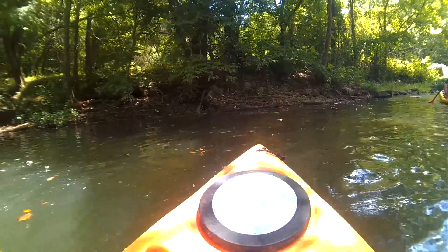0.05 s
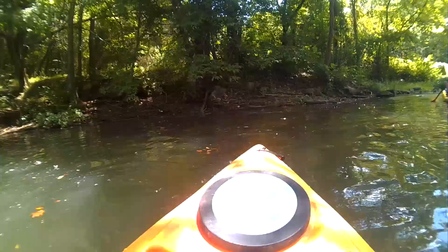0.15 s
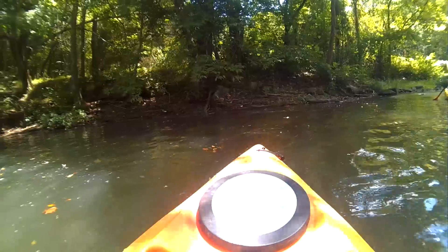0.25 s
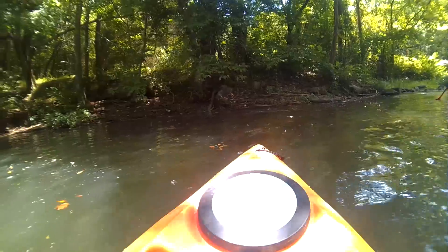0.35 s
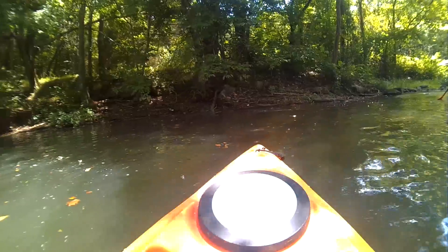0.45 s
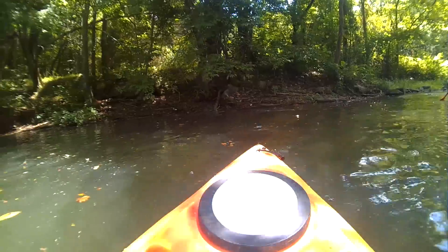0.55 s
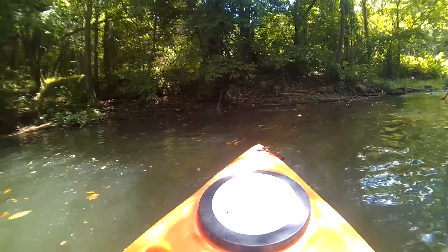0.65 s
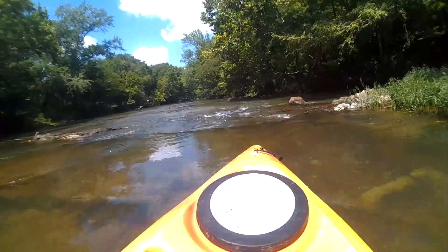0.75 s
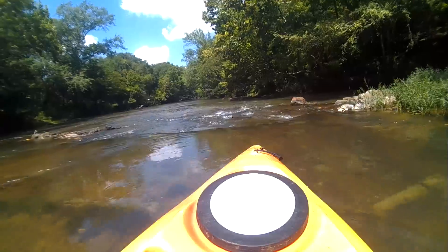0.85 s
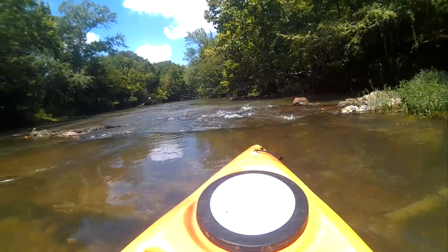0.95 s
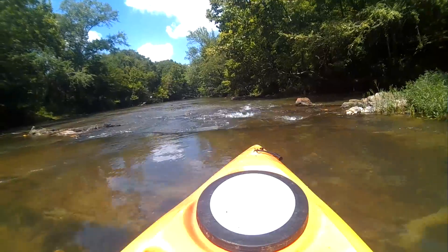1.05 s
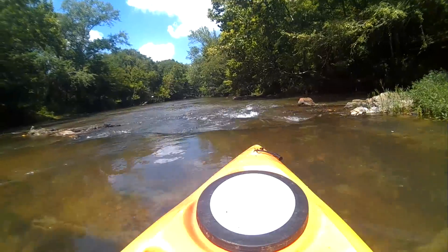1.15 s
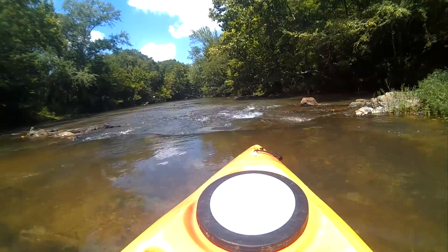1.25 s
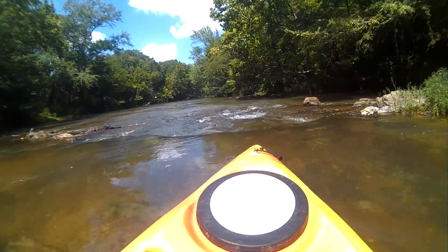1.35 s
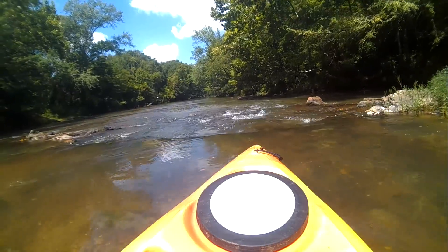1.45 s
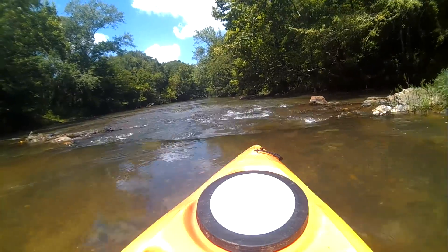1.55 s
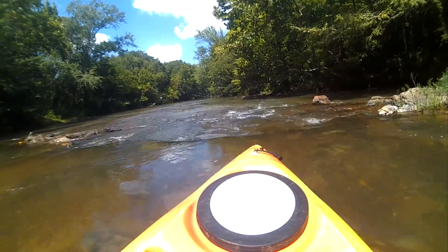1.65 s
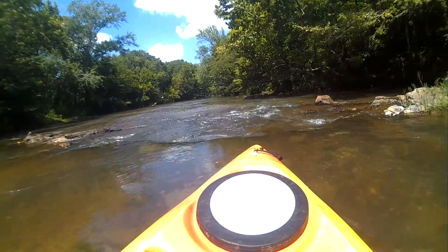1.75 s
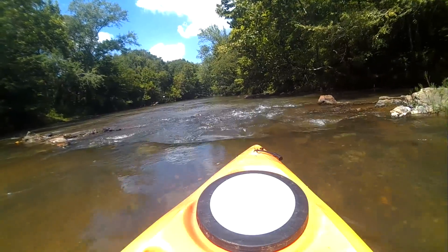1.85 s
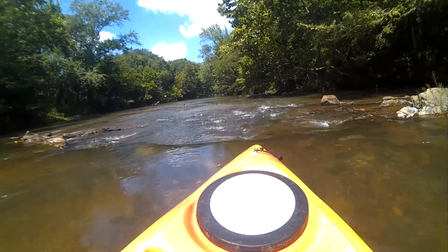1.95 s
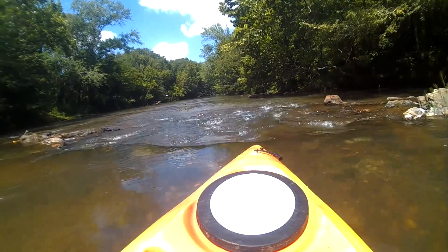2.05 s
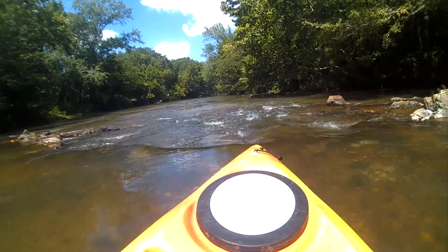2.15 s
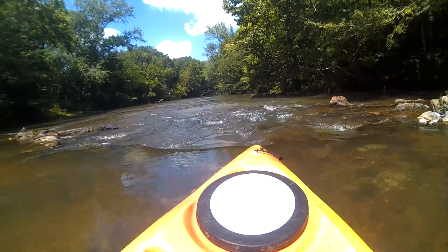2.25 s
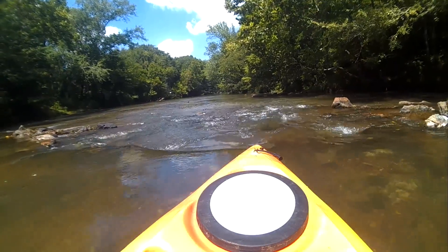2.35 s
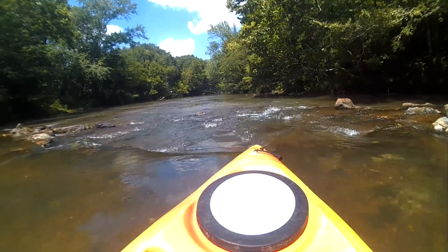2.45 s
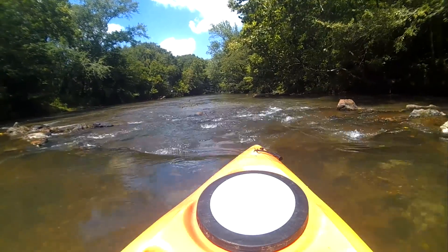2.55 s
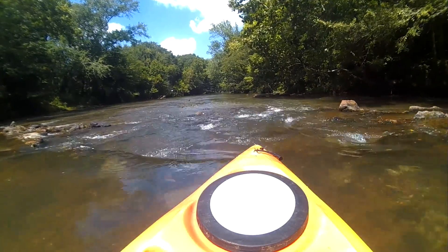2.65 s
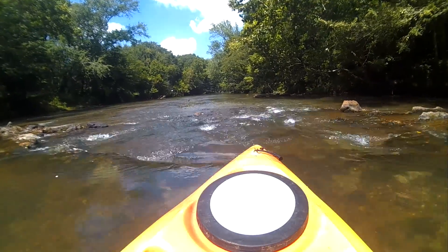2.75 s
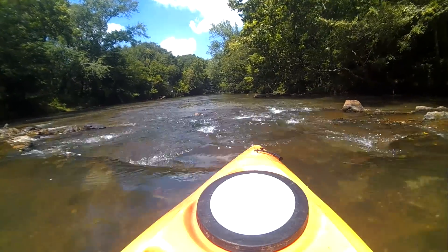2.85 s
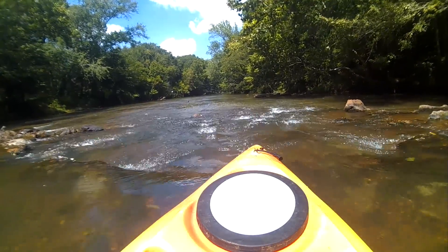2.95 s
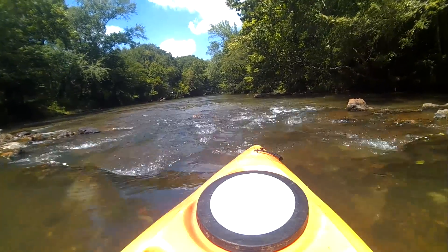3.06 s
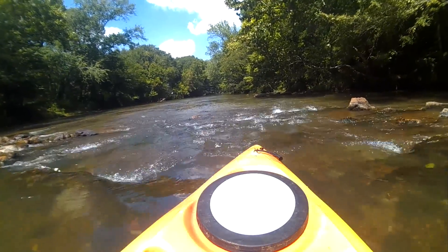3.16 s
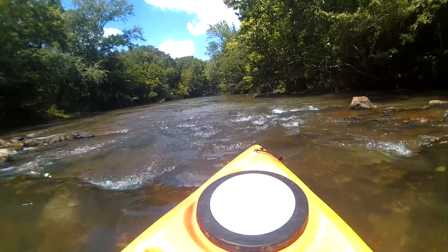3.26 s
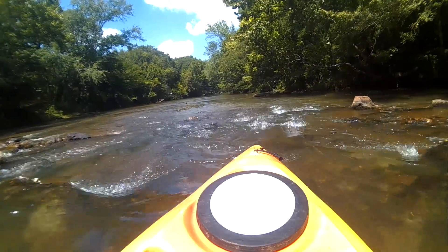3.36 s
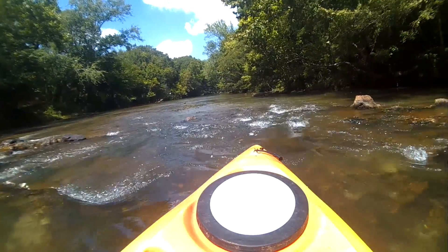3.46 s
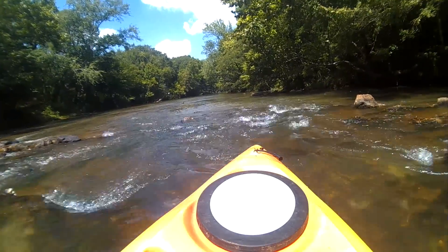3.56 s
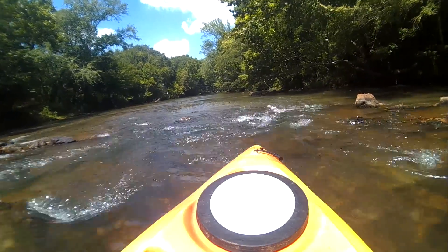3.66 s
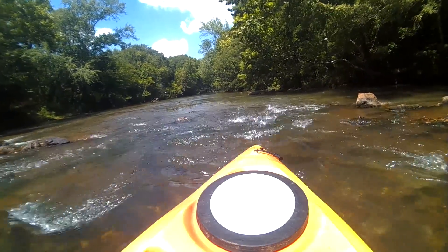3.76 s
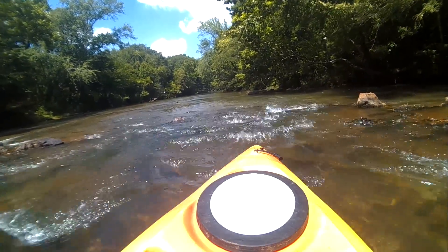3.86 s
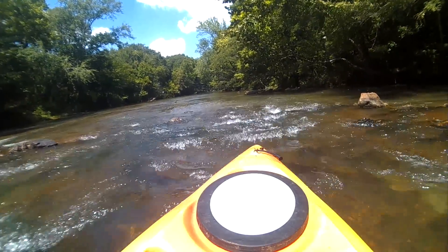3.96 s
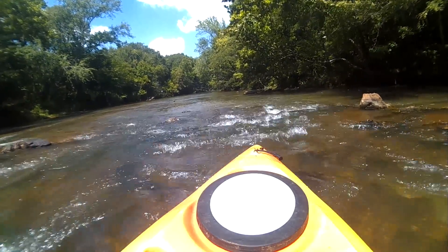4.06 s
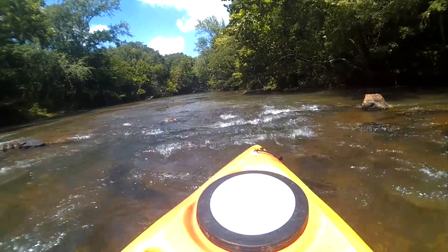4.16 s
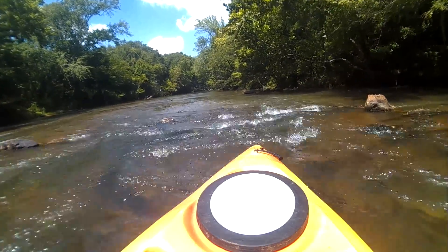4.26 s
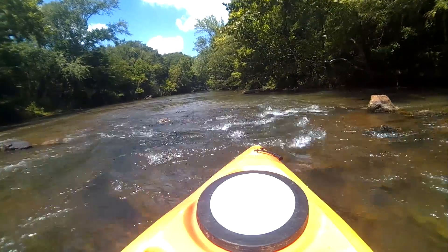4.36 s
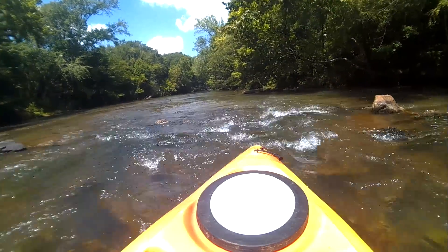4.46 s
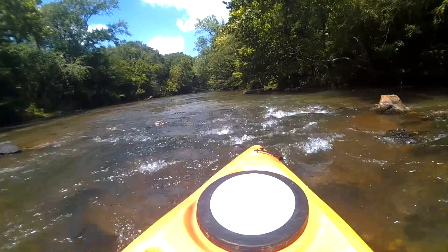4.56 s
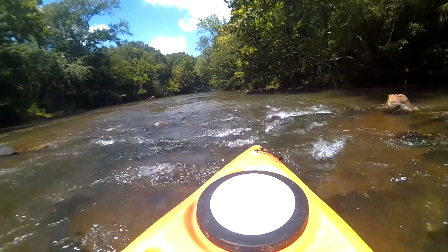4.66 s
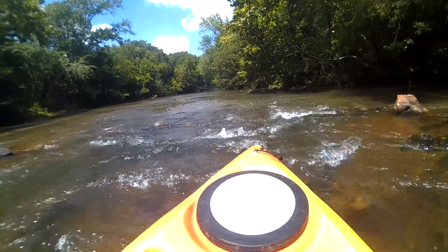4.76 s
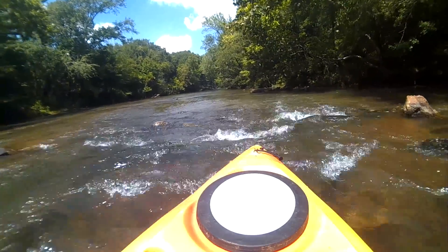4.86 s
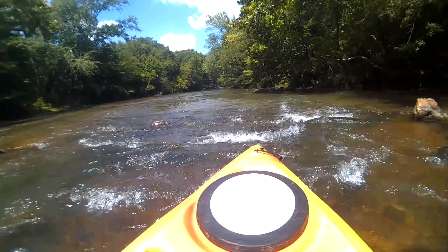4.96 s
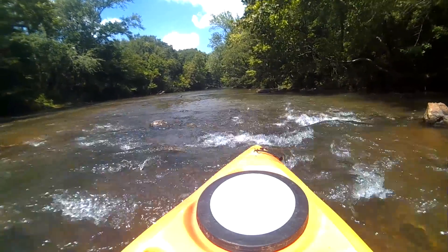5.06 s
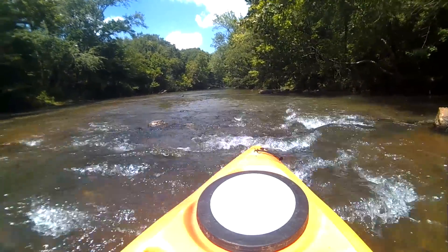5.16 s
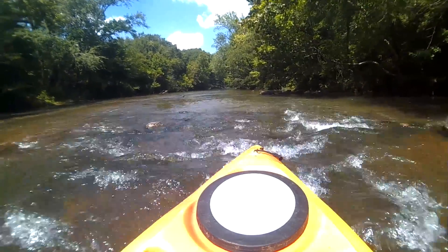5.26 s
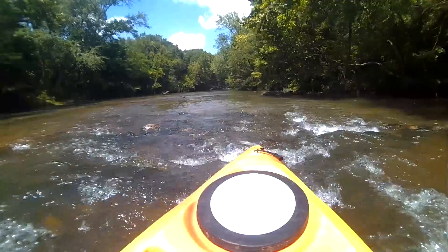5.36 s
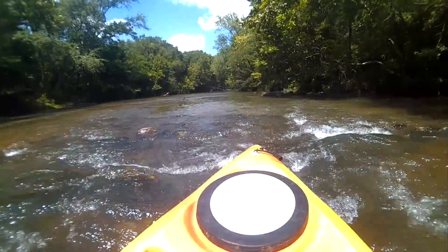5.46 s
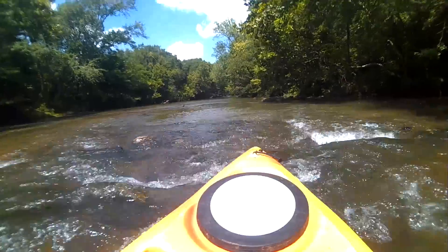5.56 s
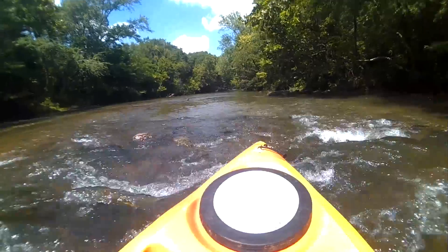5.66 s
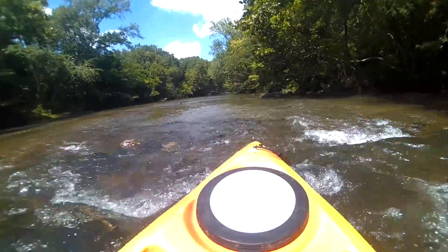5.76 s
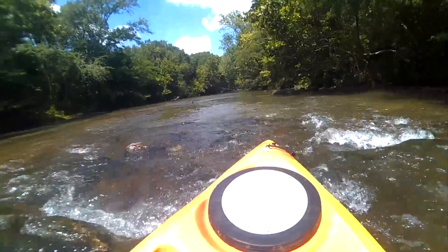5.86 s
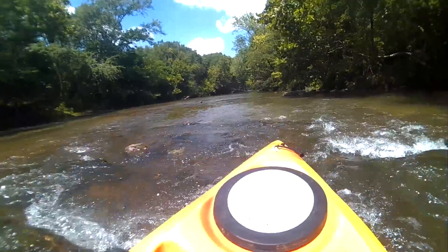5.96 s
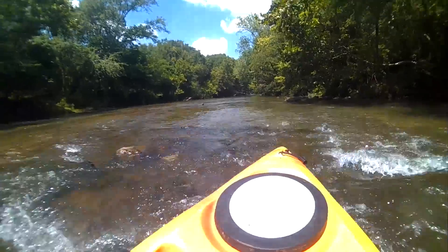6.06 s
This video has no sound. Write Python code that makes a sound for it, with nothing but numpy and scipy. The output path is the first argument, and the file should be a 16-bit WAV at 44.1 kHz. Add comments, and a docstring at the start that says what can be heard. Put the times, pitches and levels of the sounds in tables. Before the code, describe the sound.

Outdoors on a shallow creek, heard close and boxy on a kayak: very quiet water with faint hiss and a thin high whine, then an abrupt step up to gentle burbling. Wavelets tap and thump the hollow hull, increasingly busy. Finally the bottom slams and scrapes over rocks, overloading the microphone with low boom and harsh clatter, before easing into bubbling and renewed scraping.

```python
"""A plastic kayak hull strikes and grinds over stones: noise rings its modes, knocks ring a sealed case,
and a low boom drives the microphone diaphragm to its stops. Before that, calm water gives way to a riffle
drawing near: coloured noise and damped tones, muffled by the case. Waves thump the hull, gurgle and tap.
Preamplifier hiss and a thin high whine lie beneath."""
import sys
import numpy as np
from scipy import signal
from scipy.fft import rfft, irfft, next_fast_len
from scipy.io import wavfile
from scipy.ndimage import uniform_filter1d, map_coordinates

SR = 44100
rng = np.random.default_rng(int(sys.argv[2]) if len(sys.argv) > 2 else 0)


def convert_level_to_amplitude(level_db):
    """Map a level in decibels to its linear amplitude factor."""
    exponent = np.asarray(level_db, float) / 20
    return 10 ** exponent


def generate_wav(signal):
    """Clip the signal to [-1, 1] and save it as 16-bit WAV at the path in sys.argv[1]."""
    frames = np.transpose(np.atleast_2d(signal))
    scaled = np.clip(frames, -1, 1) * 32767
    pcm = np.round(scaled).astype(np.int16)
    wavfile.write(sys.argv[1], SR, pcm)


N = 269451

# Levels are set before the diaphragm's gating; the spectra already include the case.
# electronic whine, a comb of close lines: pitch_hz, level_db
WHINE_LINES = [(14176, -108), (14266, -106), (14357, -104), (14447, -102), (14538, -97), (14629, -93),
               (14719, -96), (14810, -104)]
# spectrum of the preamplifier hiss: frequency_hz, gain_db
HISS_SPECTRUM = [(20, -8.5), (300, -14.5), (3500, 1), (5200, -6), (5900, -19), (6900, -8.5), (8000, -22),
                 (9200, -10.5), (11000, -6.5), (12500, -6.5), (14300, -5), (15000, -9.5), (15700, -9),
                 (16000, -49)]
# the riffle draws near: time_s, level_db
RIVER_LEVEL = [(0.0, -62.5), (0.78, -64), (0.8, -57.5), (1.2, -56), (1.7, -57), (2.5, -54.5), (3.1, -55.5),
               (3.7, -54), (3.9, -52.5), (4.3, -52.5), (4.9, -46.5), (5.2, -46), (5.35, -50)]
# spectrum of the water through the case: frequency_hz, gain_db
WATER_SPECTRUM = [(59, -80), (100, -28), (166, -29.5), (391, -29), (504, -30), (555, -27.5), (1030, -13),
                  (1250, 1), (1510, -14), (2000, -15), (2280, -17.5), (2710, -13), (3330, -21), (3600, -33),
                  (4430, -34), (5760, -62.5), (9750, -120)]
# slaps near the bow ringing the case: start_s, level_db, pitch drawn at random
BOW_SLAPS = [(.165, -49), (0.368, -44), (1.091, -40.5), (1.1318, -40), (1.4718, -40), (2.17, -43),
             (2.312, -45), (2.435, -37.5), (2.487, -40), (2.595, -44), (2.6152, -38), (2.795, -42),
             (2.9577, -37.5), (3.441, -40.5), (3.908, -43), (4.0296, -38), (4.1026, -45), (4.157, -50),
             (4.2254, -37), (4.5326, -33.5), (4.7024, -32), (4.7653, -33.5), (4.8163, -34), (4.92, -33.5),
             (4.9754, -29), (5.007, -29), (5.0588, -40), (5.1185, -32), (5.169, -38), (5.254, -33)]
# waves shouldering the hull: start_s, hold_s, thump_db, gurgle_db
HULL_WAVES = [(0.071, .03, -78.5, -82), (0.257, 0.024, -73, -80), (0.346, 0.017, -77, -78),
              (0.395, .12, -72, -88), (1.334, 0.082, -63.5, -72), (1.469, 0.031, -65, -79),
              (3.264, .005, -64, -80), (3.355, 0.14, -75.5, -89), (3.716, 0.37, -75.5, -82.5),
              (4.087, .03, -70, -79), (4.242, 0.052, -74, -79), (4.367, .03, -80, -76),
              (4.475, 0.027, -73, -88), (4.585, 0.044, -59.5, -75), (4.696, .06, -64, -75),
              (4.786, 0.028, -62, -64.5), (4.879, .02, -69, -67), (4.97, 0.038, -67, -61),
              (5.101, .02, -59.5, -64), (5.17, 0.018, -56, -65), (5.238, 0.022, -60.5, -60),
              (5.289, .02, -57, -68)]
# small waves tapping the hull: start_s, level_db
WAVE_TAPS = [(1.334, -65.5), (1.38, -67), (1.42, -66), (1.468, -68), (4.724, -52), (4.982, -57),
             (5.102, -54.5), (5.279, -60)]
# what a tap rings in the hull: pitch_hz, level_db (added to the tap's), t60_s
TAP_TONES = [(243, -9.5, 0.072), (304.4, 0.0, .25), (420, -14.5, .17)]
# bubbles and short single rings: start_s, level_db, starting pitch_hz, t60_s
BUBBLE_TONES = [(.22, -70, 140, .2), (.36, -67, 146, .2), (.085, -67, 520, .1), (.21, -57, 2740, 0.09),
                (.215, -54.5, 2160, 0.055), (.81, -53, 2720, .07), (3.268, -63.5, 135, .11),
                (3.96, -59, 560, .11), (4.349, -55.5, 540, 0.074), (4.885, -45.5, 484, 0.059),
                (4.96, -52, 540, 0.19), (5.0, -55, 410, .15), (5.224, -53.5, 588, 0.11),
                (5.275, -54.5, 570, .08), (5.69, -34.5, 2660, 0.24), (5.69, -33.5, 540, 0.23),
                (5.805, -31, 405, 0.074), (5.855, -31.5, 2130, .06), (5.916, -16, 1224, 0.051),
                (5.925, -28, 446, 0.12), (5.97, -31.5, 561, 0.28), (6.0, -28.5, 635, 0.12),
                (6.0, -30, 380, 0.12), (6.04, -34, 860, 0.14), (6.05, -24.5, 1290, 0.12),
                (6.065, -32, 2120, 0.084)]
# lowest resonance of the hull: centre_hz, width_hz, gain_db
KEEL_MODE = [(59, 12, 0)]
# resonances of the hull's shell: centre_hz, width_hz, gain_db
SHELL_MODES = [(136, 26, 1.5), (232, 18, 0.5), (296.7, 29, 3.5), (413, 27, 2), (540, 46, 3.5),
               (860, 53, -24.5)]
# narrow resonances of the case: centre_hz, width_hz, gain_db
CASE_RESONANCES = [(2668, 71, -1), (2020, 160, -7), (3816, 75, -0.5)]
# roll-off of the sealed case: frequency_hz, gain_db
CASE_ROLLOFF = [(4500, -0.5), (5600, -0.5), (6000, -20.5), (16000, -35.5)]
# pitch of the struck hull, near 51 Hz; short spikes advance its phase at hard blows: time_s, pitch_hz
BOOM_PITCH = [(5.36, 102), (5.41, 52), (5.53, 49.6), (5.545, 86.7), (5.56, 55.5), (5.62, 55.5),
              (5.64, 49.3), (5.7, 47.1), (5.79, 53.8), (5.85, 52)]
# swing of the diaphragm, 0 dB = its stops: time_s, level_db
BOOM_SWING = [(5.35, -48), (5.385, 5), (5.45, 6), (5.72, -0.5), (5.77, -10), (5.8, -14.5), (5.85, -49)]
# grinding over stones: time_s, hollow_scrape_db, bright_scrape_db
GRIND_LEVELS = [(5.33, -64, -62), (5.376, -45, -38), (5.416, -25.5, -33.5), (5.46, -30.5, -34.5),
                (5.52, -31.5, -37), (5.545, -45, -31), (5.6, -45, -41), (5.64, -38, -31.5),
                (5.67, -49, -40), (5.77, -39.5, -39.5), (5.85, -49.5, -40.5), (6.02, -37.5, -37),
                (6.11, -26.5, -35.5)]
# stones shoving the hull: start_s, rumble_db, shell_db
STONE_SHOVES = [(5.352, -29, -41), (5.375, -32, -60), (5.5, -37, -22), (5.535, -31.5, -44),
                (5.628, -35.5, -22.5), (5.74, -56.5, -37.5), (5.796, -36, -34.5), (6.03, -43.5, -42)]
# stones knocking the hull: start_s, level_db, brightness_db (treble over bass), t60_s
STONE_KNOCKS = [(5.357, -26, -3, 0.12), (5.3785, -8, -6, 0.041), (5.382, -6, 6, .0084),
                (5.3902, -9, 1.5, .0084), (5.395, -8.5, -4, .043), (5.402, -15, -2, .055),
                (5.415, -26.5, -6.5, 0.078), (5.452, -16, 1, 0.013), (5.463, -35.5, 5, 0.076),
                (5.5129, -16, -9, 0.018), (5.542, -15, -1, 0.051), (5.548, -11, -3, 0.062),
                (5.562, -5.5, -4.5, 0.02), (5.571, -25, -4, 0.029), (5.623, -30.5, 0.0, 0.23),
                (5.630, -22, 2, 0.036), (5.637, -22, 12, 0.018), (5.647, -15.5, -1, .0082),
                (5.742, -37.5, 4, .035), (5.76, -34, 11, 0.037), (5.7996, -19.5, 2.5, 0.019),
                (5.804, -25.5, -4.2, 0.07), (5.915, -11, -9, 0.024), (5.929, -36, -.6, .023),
                (5.975, -30.5, 1, 0.028)]
# spectrum of the scrape through the case: frequency_hz, gain_db
SCRAPE_SPECTRUM = [(410, -40), (700, -6), (774, -40.5), (849, -11.5), (953, -11.5), (1250, -3),
                   (1590, -17.5), (1880, -11), (2140, -4.5), (2390, -13), (2720, -17.5), (3230, -22.5),
                   (3540, -34), (3920, -34), (4430, -42.5), (5760, -76.5), (9750, -120)]
# spectrum of a knock through the case: frequency_hz, gain_db
KNOCK_SPECTRUM = [(180, -58.5), (300, -2), (638, -14), (1060, -3), (1340, 8), (1740, -7), (2130, 3),
                  (2610, -8), (3020, -4.5), (3270, -13), (3700, -22), (4430, -32.5), (5760, -60.5),
                  (9750, -120)]
# treble splatter of the overdriven microphone at hard knocks: frequency_hz, gain_db
SPLATTER_SPECTRUM = [(3000, -56), (5000, -4), (7500, -16), (10000, -7.5), (12500, -3.5), (15000, -14.5),
                     (16000, -56)]


def unit(x):
    """Normalisation: the signal scaled to rms 1."""
    return x / np.sqrt(np.mean(x ** 2) + 1e-20)


def curves(rows, outside=-120):
    """Linear interpolation of each column after the time, corners rounded over 10 ms."""
    times, *columns = np.transpose(rows)
    t = np.arange(N) / SR
    lines = [np.interp(t, times, column, left=outside, right=outside) for column in columns]
    return uniform_filter1d(lines, size=SR // 100, axis=1, mode="nearest")


def wobble(rate):
    """Band-limited fluctuation: a smooth random curve with rate knots a second."""
    knots = rng.standard_normal(int(N * rate / SR) + 4)
    return map_coordinates(knots, [np.arange(N) * rate / SR])


def noise():
    """White noise: equal power at all frequencies, rms near 1."""
    return rng.standard_normal(N)


def filtered(x, response):
    """Linear filtering: the spectrum of x times a complex response of frequency."""
    m = next_fast_len(N + SR // 2)
    return irfft(rfft(x, m) * response(np.fft.rfftfreq(m, 1 / SR)), m)[:N]


def colour(points):
    """Minimum phase: a causal response from (Hz, dB) points by folding the cepstrum."""
    def response(hz):
        f, db = np.transpose(points)
        gain_db = np.interp(np.log(hz + 1), np.log(f + 1), db)
        cepstrum = irfft(np.log(convert_level_to_amplitude(gain_db)))
        half = len(cepstrum) // 2
        cepstrum[1:half] *= 2
        cepstrum[half + 1:] = 0
        return np.exp(rfft(cepstrum))
    return response


def modes(table):
    """Modal superposition: (centre Hz, width Hz, dB) resonances summed with alternating sign."""
    def response(f):
        return sum((-1) ** k * convert_level_to_amplitude(db) * 1j * f * width / (centre ** 2 - f ** 2 + 1j * f * width)
                   for k, (centre, width, db) in enumerate(table))
    return response


def split(x, edge_hz):
    """Complementary crossover: the parts below and above an edge, which sum to x."""
    below = filtered(x, lambda hz: 1 / (1 + (hz / edge_hz) ** 8))
    return below, x - below


def patchy(patchy_db, span):
    """Granular noise: its gain varies in patches of time (span frames) and pitch."""
    z = signal.stft(noise(), nperseg=256)[2]
    field = uniform_filter1d(rng.standard_normal(z.shape), 2, 0)
    field = uniform_filter1d(field, round(span), 1)
    return unit(signal.istft(z * convert_level_to_amplitude(patchy_db * unit(field)), nperseg=256)[1][:N])


def bubbles(table, rise):
    """Damped oscillation: soft-starting tones that decay by 60 dB in t60 while their pitch climbs."""
    out, t = np.zeros(N + SR), np.arange(SR // 5) / SR
    for start, db, hz, t60 in table:
        tone = np.sin(2 * np.pi * hz * t * (1 + rise * t / t60))
        envelope = convert_level_to_amplitude(db - 60 * t / t60) * (1 - np.exp(-t / 0.0021))
        out[round(start * SR):][:len(t)] += envelope * tone
    return out[:N]


def swells(rows, rise_s, fall_db_per_s):
    """Incoherent addition: powers of (start s, hold s, dB) swells that rise, hold and fall."""
    t = np.arange(N) / SR
    power = 0
    for start, hold, db in rows:
        falling = np.clip(t - start - rise_s - hold, 0, None)
        power = power + convert_level_to_amplitude(db - fall_db_per_s * falling) ** 2 * np.clip((t - start) / rise_s, 0, 1) ** 2
    return np.sqrt(power)


def ringing(x):
    """Parallel resonance: narrow modes of the case added to the direct sound."""
    return filtered(x, lambda f: 1 + sum(modes([mode])(f) for mode in CASE_RESONANCES))


def shell(patchy_db):
    """Modal excitation: noise rings the hull's shell, dull above its modes."""
    def dull_shell(hz):
        return modes(SHELL_MODES)(hz) / (1 + (hz / 900) ** 4)
    return unit(filtered(patchy(patchy_db, span=10), dull_shell))


def electronics():
    """Electronic self-noise: preamplifier hiss and a comb of sines, both stronger for the first 0.78 s."""
    t = np.arange(N) / SR
    early = t < 0.78
    strongest = np.argmax([db for _, db in WHINE_LINES])
    whine = np.zeros(N)
    for k, (hz, db) in enumerate(WHINE_LINES):
        # neighbouring lines in quadrature: the pitch warbles more than the level
        phase = np.pi / 2 * abs(k - strongest)
        whine += np.sqrt(2) * convert_level_to_amplitude(db + 0.89 * wobble(15)) * np.sin(2 * np.pi * hz * t + phase)
    hiss = convert_level_to_amplitude(-84.5 + 0.8 * wobble(60)) * unit(filtered(noise(), colour(HISS_SPECTRUM)))
    return whine * convert_level_to_amplitude(np.where(early, 3.5, 0)) + hiss * convert_level_to_amplitude(np.where(early, 1.5, 0))


def river():
    """Random superposition: countless splashes ring the case; near ones stand out in short bursts."""
    slap_hz, slap_t60_s = 1222, 0.035  # centre of the random spread
    level_db, = curves(RIVER_LEVEL)
    bursts = convert_level_to_amplitude(0.38 * wobble(10) + 0.9 * wobble(70))
    splashes = bursts * patchy(patchy_db=1.0, span=5)
    wash = unit(ringing(filtered(splashes, colour(WATER_SPECTRUM))))

    slaps = []
    for start, db in BOW_SLAPS:
        a, b = rng.standard_normal(2)
        slaps.append((start, db, slap_hz * (1 + 0.035 * a), slap_t60_s * np.exp(0.27 * b)))

    small = []
    for when, a, b, c in rng.uniform(size=(150, 4)):
        over_river_db = 8 * a
        hz = slap_hz * (1 + 0.16 * (b - 0.5))
        small.append((when * N / SR, over_river_db, hz, slap_t60_s * (0.6 + c)))
    return convert_level_to_amplitude(level_db) * (wash + bubbles(small, rise=0.015)) + bubbles(slaps, rise=0.0084)


def waves():
    """Forced and free vibration: waves push the keel, gurgle along the shell and tap it."""
    rise_s = 0.02
    river_db, = curves(RIVER_LEVEL)
    # between the waves, a calm push and slosh follow the river's level
    calm_push = convert_level_to_amplitude(river_db - 26.5 + 2.5 * wobble(5))
    calm_slosh = convert_level_to_amplitude(0.39 * river_db - 60 + 1.7 * wobble(3.8))
    thumps = [(start, hold, db) for start, hold, db, _ in HULL_WAVES]
    gurgles = [(start, hold, db) for start, hold, _, db in HULL_WAVES]
    push = swells(thumps, rise_s, fall_db_per_s=202.5) + calm_push
    slosh = swells(gurgles, rise_s, fall_db_per_s=300) + calm_slosh
    keel = unit(filtered(filtered(noise(), modes(KEEL_MODE)), modes([(45, 67, 0)])))

    taps = [(start, db + level, hz, t60) for start, db in WAVE_TAPS for hz, level, t60 in TAP_TONES]
    # each wave also starts the keel ringing: 61 Hz, t60 0.44 s
    taps += [(start, db + 4.5, 61, 0.44) for start, _, db in thumps]
    tones = bubbles(taps, rise=0.003) + bubbles(BUBBLE_TONES, rise=0.031)
    return convert_level_to_amplitude(-1) * push * keel + slosh * shell(patchy_db=5.5) + tones


def boom():
    """Phase integration: the struck hull's lowest mode swings the diaphragm, 1 = its stops."""
    hz, = curves(BOOM_PITCH, outside=0)
    swing_db, = curves(BOOM_SWING)
    return convert_level_to_amplitude(swing_db) * np.cos(2 * np.pi * np.cumsum(hz) / SR)


def grinding():
    """Friction excitation: grainy scrape, hull rumble and airy treble share the bright scrape's level."""
    rise_s = 0.01
    hollow_db, bright_db = curves(GRIND_LEVELS)
    rumble_shoves = [(start, 0, db) for start, db, _ in STONE_SHOVES]
    shell_shoves = [(start, 0, db) for start, _, db in STONE_SHOVES]
    shell_gain = convert_level_to_amplitude(bright_db - 1) + swells(shell_shoves, rise_s, fall_db_per_s=595.5)
    rumble_gain = convert_level_to_amplitude(bright_db - 7.5) + swells(rumble_shoves, rise_s, fall_db_per_s=297)

    grit = convert_level_to_amplitude(0.98 * wobble(120)) * patchy(patchy_db=3.5, span=24)
    hollow, bright = split(ringing(filtered(grit, colour(SCRAPE_SPECTRUM))), edge_hz=1410)
    scrape = convert_level_to_amplitude(hollow_db) * unit(hollow) + convert_level_to_amplitude(bright_db) * unit(bright)
    scrape += shell_gain * shell(patchy_db=5.0)

    # the airy treble has the splatter's spectrum
    air = convert_level_to_amplitude(bright_db - 48) * unit(filtered(noise(), colour(SPLATTER_SPECTRUM)))
    deep = filtered(filtered(noise(), modes([(65.5, 54, 0)])), modes([(61.0, 140, 0)]))
    return scrape, rumble_gain * unit(deep), air


def knocking():
    """Impact excitation: an impulse and a decaying rattle ring the case; the overdriven microphone splatters."""
    t = np.arange(SR // 10) / SR
    dull, sharp, splatter = np.zeros((3, N + SR))
    for start, db, brightness_db, t60 in STONE_KNOCKS:
        shake = convert_level_to_amplitude(-60 * t / t60) * (1 - np.exp(-t / 0.00043)) * rng.standard_normal(len(t))
        shake /= np.sqrt(np.sum(shake ** 2) / (t60 * SR))  # energy in proportion to t60
        shake[0] += 12.5  # the blow itself
        # harder, brighter and shorter knocks splatter more: 3.5 dB for each halving of t60
        splatter_db = -40.5 + 1.64 * db + 1.3 * brightness_db - 3.5 * np.log2(100 * t60)
        here = slice(round(start * SR), round(start * SR) + len(t))
        dull[here] += convert_level_to_amplitude(db) * shake
        sharp[here] += convert_level_to_amplitude(db + brightness_db) * shake
        splatter[here] += convert_level_to_amplitude(splatter_db - 60 * t / 0.03) * shake  # a further decay on the shake's own

    low = split(dull[:N], edge_hz=1500)[0]
    high = split(sharp[:N], edge_hz=1674)[1]
    knocks = filtered(low + high, colour(KNOCK_SPECTRUM))
    knocks /= (1 + np.abs(knocks / 0.95) ** 4) ** 0.25  # soft limit at 0.95
    return knocks, filtered(splatter[:N], colour(SPLATTER_SPECTRUM))


def scene():
    """Saturation: the boom flattens at the stops; finer sound passes between, part of every knock even there."""
    scrape, rumble, air = grinding()
    knocks, splatter = knocking()
    hardness = 24
    swing = boom() + 5.8 * rumble  # the rumble shifts the moments of hitting the stops
    squeeze = 1 / (1 + np.abs(swing) ** hardness)
    flattened = swing * squeeze ** (1 / hardness)
    passing = squeeze ** (1 + 1 / hardness)  # slope of the flattening: 1 when free, 0 at the stops

    def bass_cut(hz):
        return 0.5 + 1j * hz / (200 + 1j * hz)

    fine = river() + waves() + scrape
    heard = convert_level_to_amplitude(-17.0) * filtered(flattened, bass_cut)
    heard += (0.011 + passing) * fine
    heard += (0.33 + 0.91 * passing) * knocks  # part of every knock gets through even at the stops
    muffled = filtered(heard + rumble, colour(CASE_ROLLOFF))
    treble = splatter + (0.29 + 0.8 * passing) * (air + electronics())
    return (muffled + treble)[None]


def low_pass(x):
    """Removes everything above the highest recorded frequency."""
    return signal.sosfilt(signal.butter(12, 15750, fs=SR, output="sos"), x)


def record(dry):
    """Signal chain: the finished mix goes to its last stage."""
    return low_pass(dry)


dry = scene()
out = record(dry)
generate_wav(out)
```